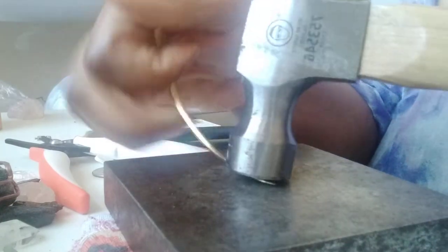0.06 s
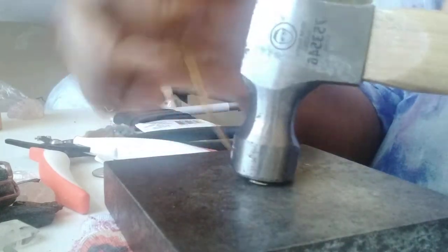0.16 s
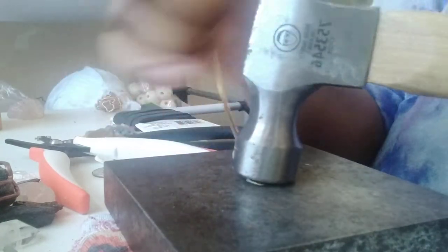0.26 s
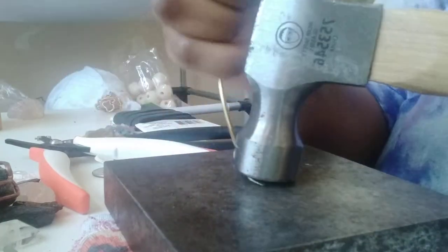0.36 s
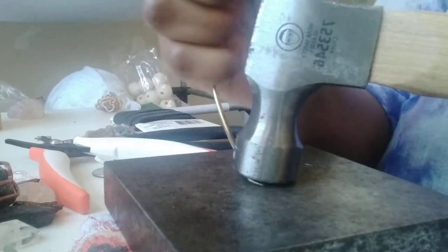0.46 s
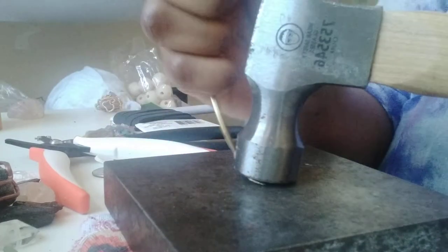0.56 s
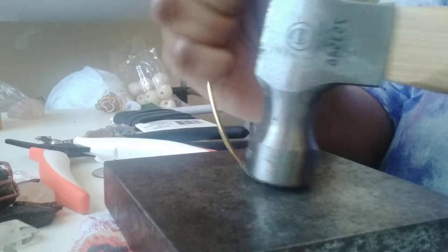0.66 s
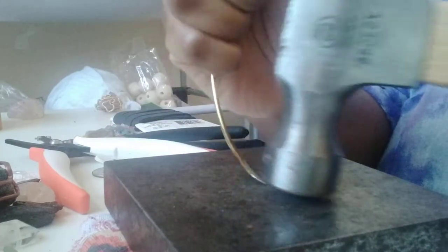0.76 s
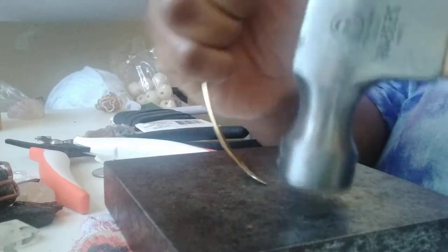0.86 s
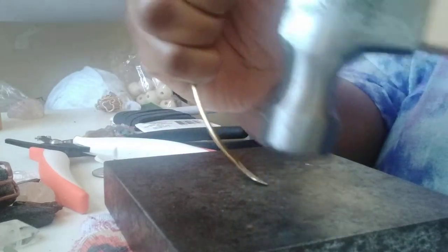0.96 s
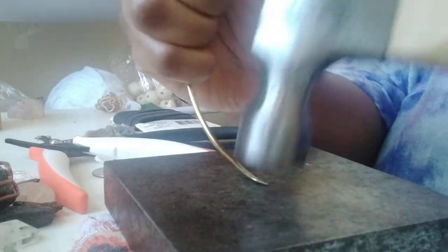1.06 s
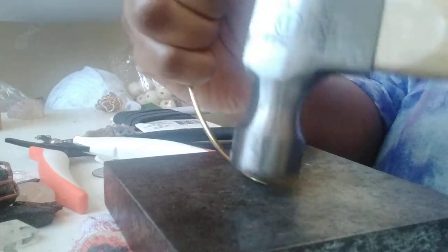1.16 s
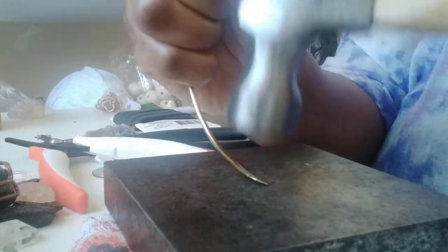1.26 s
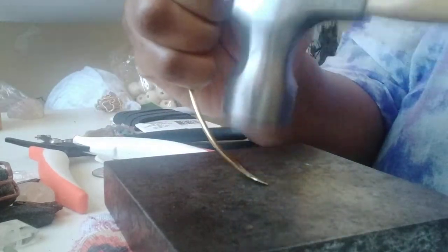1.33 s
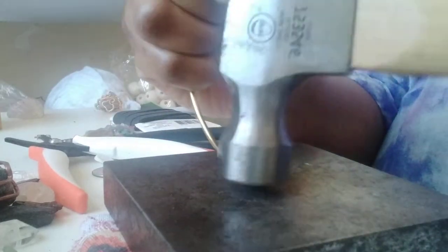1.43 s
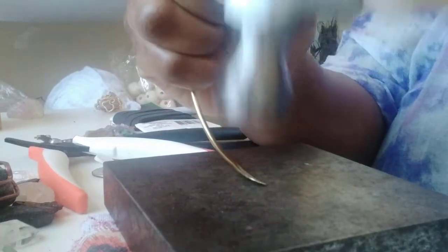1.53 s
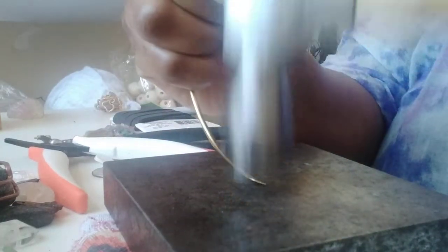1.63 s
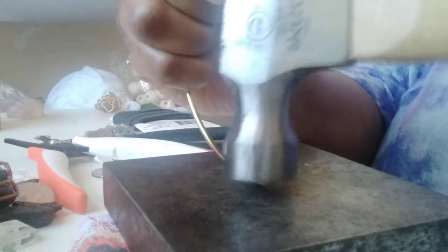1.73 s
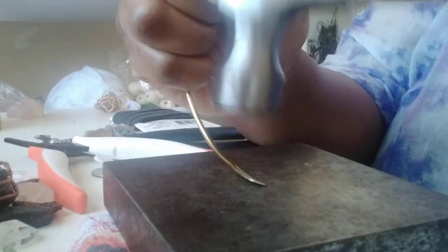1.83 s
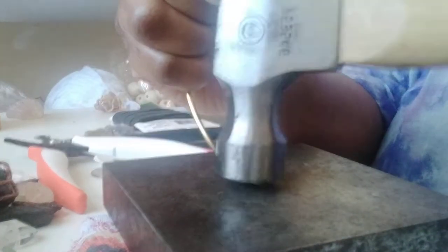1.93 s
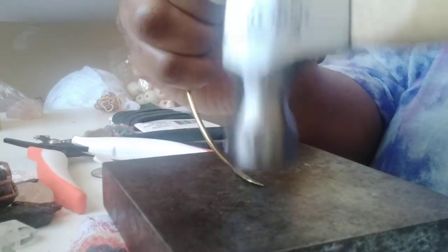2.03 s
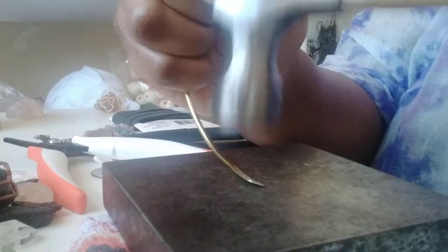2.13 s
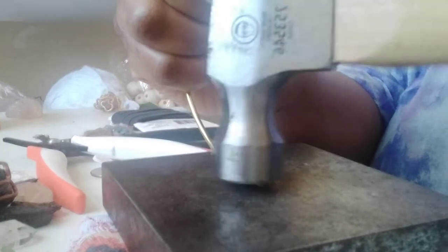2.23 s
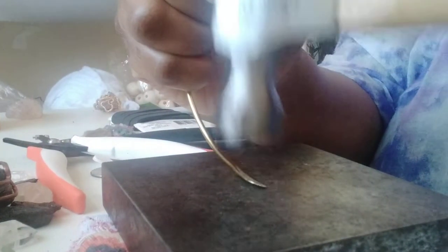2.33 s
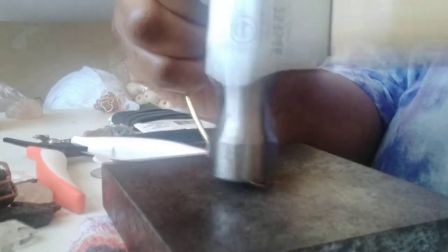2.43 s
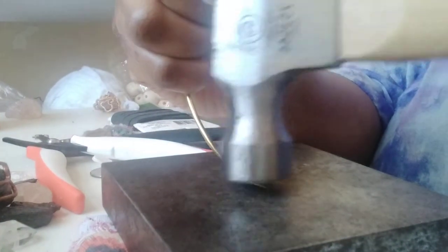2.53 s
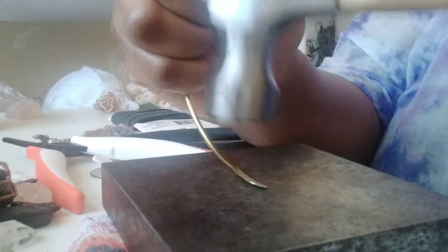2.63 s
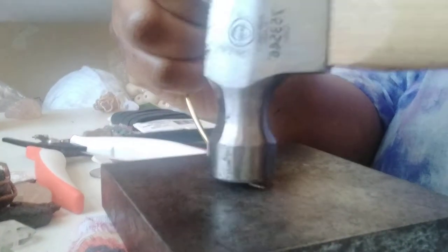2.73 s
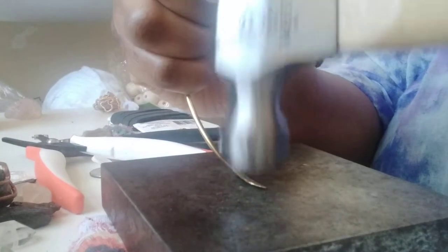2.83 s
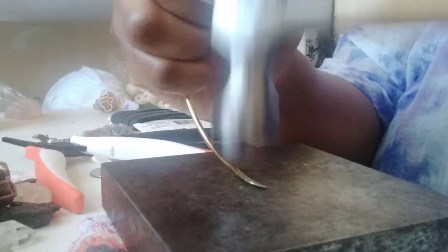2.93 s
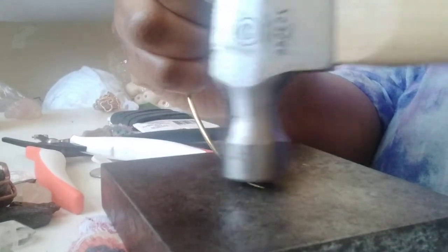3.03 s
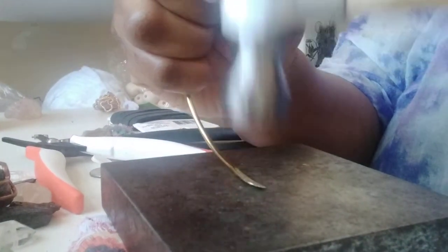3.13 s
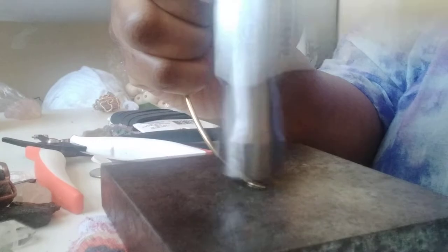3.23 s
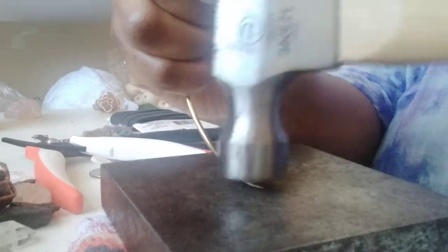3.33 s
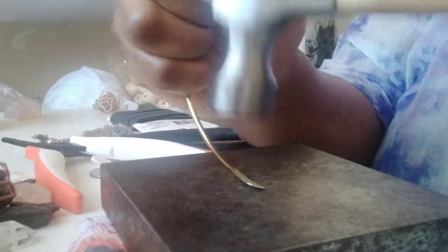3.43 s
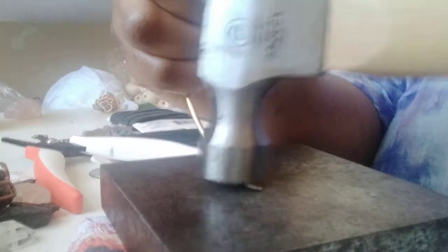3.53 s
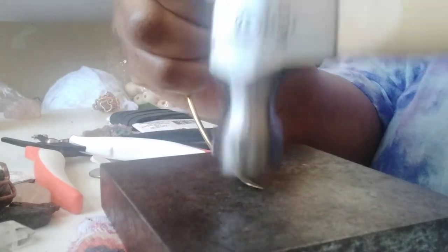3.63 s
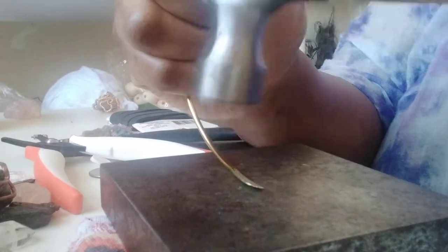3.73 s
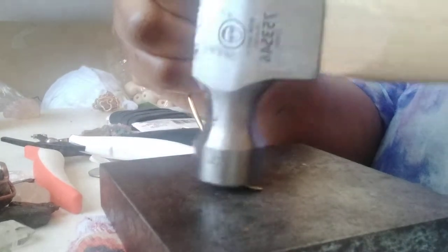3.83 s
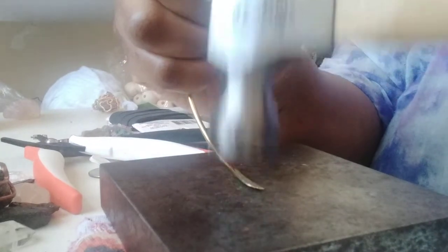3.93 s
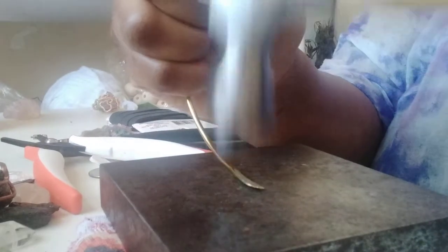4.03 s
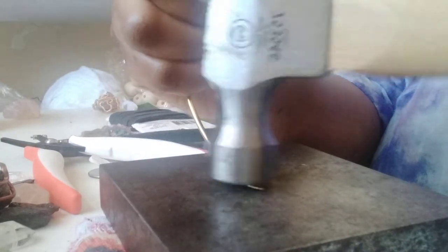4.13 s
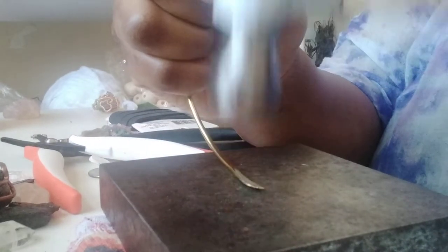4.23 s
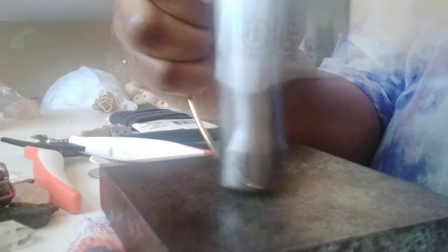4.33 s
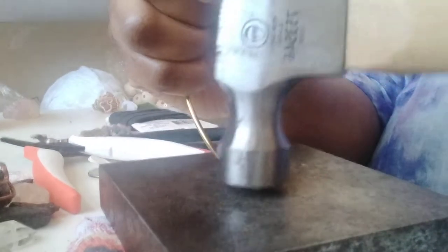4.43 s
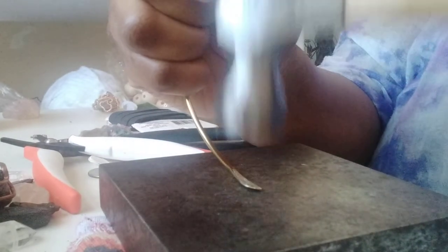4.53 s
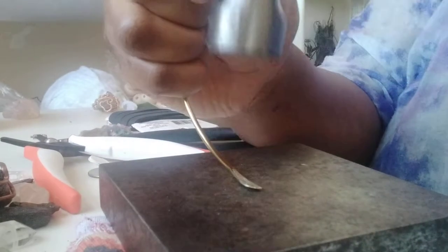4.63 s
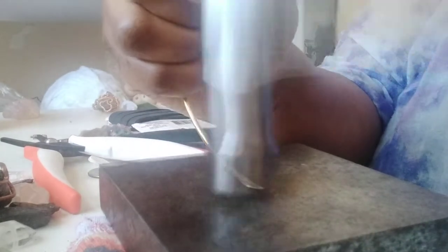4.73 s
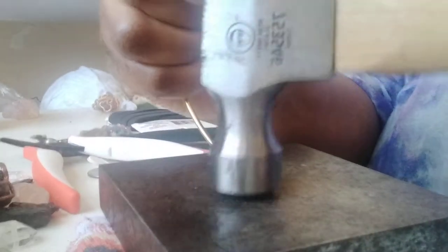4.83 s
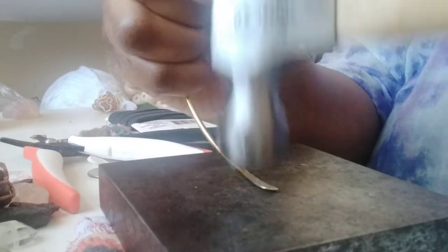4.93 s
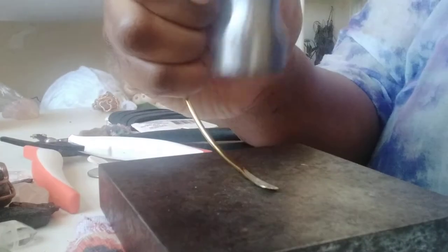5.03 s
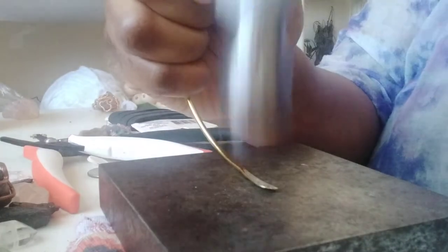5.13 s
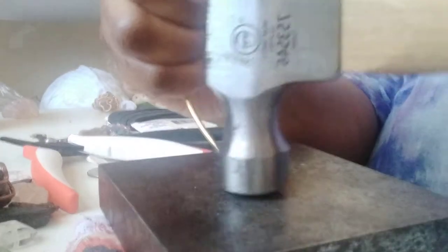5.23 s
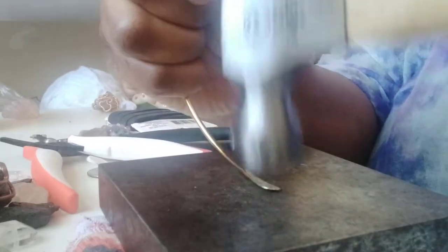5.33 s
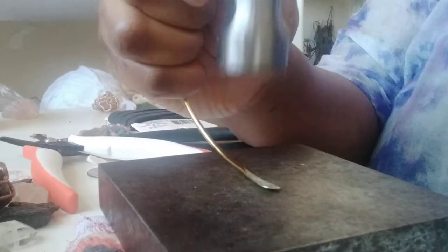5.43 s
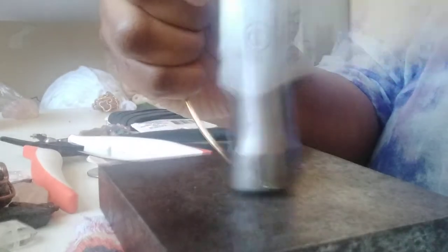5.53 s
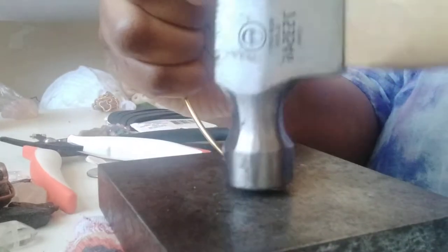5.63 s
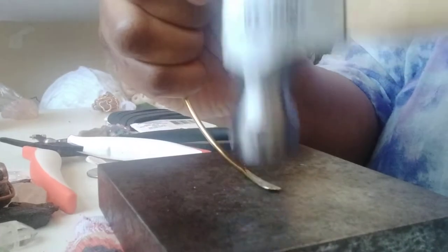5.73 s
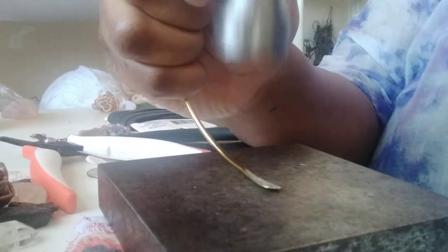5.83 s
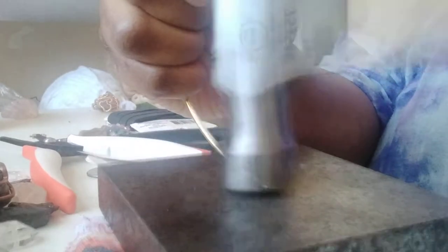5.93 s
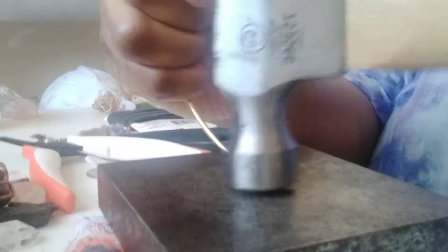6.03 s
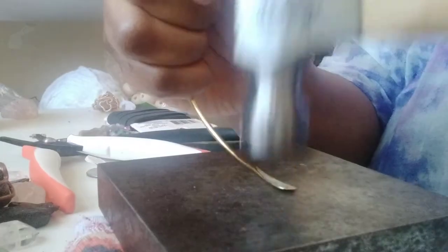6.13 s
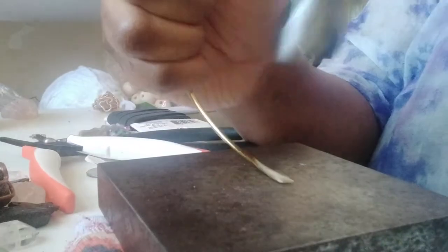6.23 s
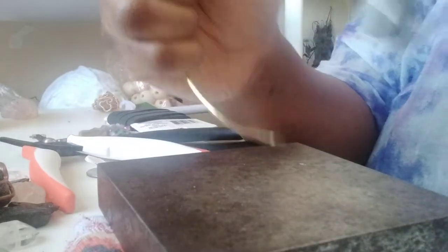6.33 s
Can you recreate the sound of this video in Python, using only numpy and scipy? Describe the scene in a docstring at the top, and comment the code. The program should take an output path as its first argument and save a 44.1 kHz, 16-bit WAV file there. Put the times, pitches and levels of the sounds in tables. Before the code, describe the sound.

In a small workroom over low rumble, faint taps and scuffs lead into twelve quick hammer blows on soft wire laid on a steel block. Each thumps the bench and makes loose clutter jump and rattle, growing heavier. Then five slower, much louder blows hit bare steel, ringing bright and high and overloading the close phone microphone. A few small taps and scuffs end it.

```python
"""Small taps and scuffs open the scene and return between the blows, over a low rumble and faint hiss.
Twelve blows on soft wire then grow heavier: each thumps the bench and shakes loose clutter, which rattles as it lands.
After 4.2 s five hard blows meet bare steel: head and block ring clear and overload the phone's input.
A few last taps follow. Filtered noise, decaying sines and random clicks make these sounds, with a short room tail.
"""
import sys
import numpy as np
from scipy import signal
from scipy.fft import rfft, irfft, next_fast_len
from scipy.io import wavfile
from scipy.ndimage import uniform_filter1d

SR = 44100
rng = np.random.default_rng(int(sys.argv[2]) if len(sys.argv) > 2 else 0)


def output_pcm(signal):
    """Save a mono or channel-first signal as 16-bit PCM at the path in sys.argv[1].

    Samples are clipped to [-1, 1] before scaling.
    """
    pcm = np.clip(np.atleast_2d(signal).T, -1, 1) * 32767
    wavfile.write(sys.argv[1], SR, np.round(pcm).astype(np.int16))


N = 280917  # length in samples


def undb(db):
    """Level law: decibels become an amplitude ratio."""
    return 10 ** (np.asarray(db) / 20)


def unit(x):
    """Normalisation: scale a signal to an rms of 1."""
    return x / np.sqrt(np.mean(x ** 2))


def colour(x, points, share=1):
    """Spectral shaping: a gain through (Hz, dB) points joined on a log-frequency axis."""
    size = next_fast_len(x.shape[-1])
    hz, db = np.transpose(points)
    log_hz = np.log(np.fft.rfftfreq(size, 1 / SR) + 1)
    gain = undb(share * np.interp(log_hz, np.log(np.maximum(hz, 1)), db))
    return irfft(rfft(x, size) * gain, size)[..., :x.shape[-1]]


def band(x, hz, width):
    """Resonance: a single peak filter of the given width in Hz."""
    return signal.lfilter(*signal.iirpeak(hz, hz / width, SR), x)


def add(out, s, x):
    """Superposition: mix x into out from time s on."""
    i = int(s * SR)
    n = min(x.shape[-1], N - i)
    out[..., i:i + n] += x[..., :n]


def ring(modes, t, scatter_db, damping=1):
    """Modal decay: damped sines whose levels, save the first, scatter anew at each blow."""
    chance = rng.standard_normal(len(modes))
    total = 0
    for k, ((hz, db, t60), c) in enumerate(zip(modes, chance)):
        level = undb(db + scatter_db * c * (k > 0))
        total = total + level * np.sin(2 * np.pi * hz * t) * undb(-60 * t * damping / t60)
    return total


def burst(t, start, rise, hold, fall):
    """Transient envelope, in seconds: a smooth rise, a plateau, an exponential fall."""
    up = np.clip((t - start) / rise, 0, 1)
    return up ** 2 * (3 - 2 * up) * np.exp(-np.maximum(t - start - rise - hold, 0) / fall)


def grains(rate, spread_db):
    """Impact statistics: random clicks of uneven size, rate per second, unrelated at the two microphones."""
    size = undb(spread_db * rng.exponential(size=(2, N))) * rng.standard_normal((2, N))
    return size * (rng.random((2, N)) < rate / SR)


def flicker(rate, spread_db):
    """Random modulation: a level in dB that changes about rate times a second."""
    k = int(SR / rate)
    smooth = uniform_filter1d(uniform_filter1d(rng.standard_normal(N), k), k)
    return spread_db * unit(smooth)


def played(envelope, clicks, points):
    """Excitation and colour: clicks under an envelope, then shaped, scaled by the rms of the shaped clicks."""
    return colour(envelope * clicks, points) / np.std(colour(clicks, points))


def shimmer(bands, t):
    """High modal density: crowded modes as decaying narrow noise, unrelated at the two microphones."""
    total = 0
    for hz, width, db, t60 in bands:
        noise = rng.standard_normal((2, len(t)))
        narrow = band(band(noise, hz, width), hz, width)
        total = total + undb(db - 60 * t / t60) * unit(narrow)
    return total


RUMBLE_DB, HISS_DB = -46, -75
# Spectrum of the rumble. Each row: frequency in Hz, relative density in dB per Hz.
RUMBLE_SPECTRUM = [(12, -28.5), (20, 4), (40, 1), (75, -10), (105, -5.5), (131, -14), (157, -18),
                   (192, -8.5), (312, -22), (406, -24), (497, -32.5), (646, -34), (948, -44), (2500, -48.5),
                   (3250, -46.5), (5500, -65)]


def rumble():
    """Coherent noise field: the wavering low rumble of the house, nearly alike at both microphones, over hiss."""
    mid, side = (unit(colour(rng.standard_normal(N), RUMBLE_SPECTRUM)) for _ in range(2))
    low = undb(RUMBLE_DB + flicker(4.9, 3.2)) * (mid + .35 * side * np.array([[1], [-1]]))
    return low + undb(HISS_DB) * rng.standard_normal((2, N))


ROOM_DB = -13.5  # energy of the tail relative to the direct sound
# Reverberation of the small room. Each row: band centre in Hz, time to fall by 60 dB in seconds.
ROOM_DECAY = [(300, 0.2), (1000, 0.39), (3000, 0.38), (7000, 0.32), (12000, 0.12)]


def room(x):
    """Diffuse reverberation: convolve with a separate noise tail per microphone, shortest in the top band."""
    t = np.arange(SR // 2) / SR
    tail = 0
    for hz, t60 in ROOM_DECAY:
        noise = band(rng.standard_normal((2, len(t))), hz, 1.68 * hz)
        tail = tail + noise / np.sqrt(hz * t60) * undb(-60 * t / t60)
    tail = tail * burst(t, .002, .004, 1, 1)
    tail = tail / np.sqrt(np.sum(tail ** 2, axis=1, keepdims=True))
    return undb(ROOM_DB) * signal.fftconvolve(x, tail, axes=1)[:, :N]


BARE_FROM_S = 4.2  # from here the wire is flat and the head meets bare steel
CHATTER_DB = (-8.5, 5.5)  # above the jump: (on soft wire, on bare steel)
KNOCK_DB, KNOCK_SLOPE = -2, 0.82  # landing knock at a 0 dB landing; dB per dB
KNOCK_S, FIRST_KNOCK_DB = 0.0417, -3.5  # heavy things land after this; knock of the blow relative to the landing's
KNOCK_TOP_HZ = 1850
# Hammer blows. Each row: start in seconds, force in dB, bench bounce in Hz, bounce level in dB,
# contact crack in dB, clutter jump in dB, delay until the clutter lands in ms, landing level in dB.
HAMMER_BLOWS = [(1.072, -41, 32, -23.5, -70, -63, 20, -62.5),
                (1.3455, -29.5, 33.6, -11, -48.5, -28.5, 36, -32),
                (1.6166, -25, 34.3, -10.5, -43.5, -35, 34, -27),
                (1.871, -23.5, 34.4, -9, -43.5, -27, 32.4, -24),
                (2.1398, -26, 34.4, -7.5, -43, -27.5, 28, -22.5),
                (2.3952, -21, 39, -6, -41, -26, 32.4, -26),
                (2.664, -17, 36.1, -4.5, -28.5, -15.5, 28.7, -21),
                (2.9237, -17, 46, -6.5, -29, -32.5, 13.6, -31.5),
                (3.2036, -16, 36.4, -5, -31.5, -17, 28, -19.5),
                (3.478, -14, 41.2, -5.5, -36, -26, 23.3, -25.5),
                (3.7499, -9, 44.1, -3.5, -31, -15, 25.8, -17),
                (4.0243, -10, 43.6, -4, -19, -6.5, 23.6, -21.5),
                (4.3003, -1, 40.9, -13.5, -12, -11, 31.7, -12.5),
                (4.7068, -2.6, 40.0, -22.5, -13, -15, 24.8, -15),
                (5.1267, -1.2, 40.5, -8, -12, -21, 21.8, -13),
                (5.4976, -2, 40.0, -23, -4.5, -9.5, 21.2, -14.5),
                (5.8965, 1.2, 39.8, -31.5, -11, -13.5, 28, -11)]
# Small taps of wire, hand and clutter. Each row: start in seconds, knock in dB, scuff in dB, wire ring in dB.
SMALL_TAPS = [(0.148, -57, -59, -78), (0.597, -59, -54.5, -79), (0.642, -66, -59.5, -74),
              (0.979, -48.5, -75, -62), (1.111, -69, -60, -59), (2.352, -47, -72, -68),
              (2.537, -37, -43, -63), (3.89, -34, -56, -69), (4.592, -46.5, -37, -49.5),
              (4.613, -44, -63, -51), (5.406, -43.5, -53, -66), (5.431, -42.5, -52, -59),
              (5.459, -43.5, -54, -62), (6.156, -49, -50.5, -62), (6.197, -42, -43.5, -70),
              (6.221, -44, -43.5, -70), (6.232, -54, -41.5, -76), (6.279, -67.5, -54.5, -77.5),
              (6.31, -61, -57, -81)]
# Clutter under blows on soft wire. Each row: frequency in Hz, relative density in dB per Hz.
SOFT_BLOW_RATTLE = [(300, -11), (600, -1), (900, -14.5), (1800, -7.5), (3200, -9), (5000, -16.5),
                    (6400, -21.5), (7500, -20), (8800, -25), (10400, -26), (11600, -36), (15700, -50.5)]
# Clutter under blows on bare steel. Each row: frequency in Hz, relative density in dB per Hz.
HARD_BLOW_RATTLE = [(290, -16.5), (500, -10.5), (943, -18.5), (1700, -13), (2900, -13), (4740, -15.5),
                    (6060, -22), (7100, -19.5), (9330, -31.5), (10500, -23.5), (11800, -57), (15700, -50)]
# Scuffing of the small taps. Each row: frequency in Hz, relative density in dB per Hz.
SCUFF_SPECTRUM = [(600, -17), (1500, 3.3), (3500, 2), (5000, -14), (7500, -11), (10000, -16), (14000, -59)]
# Resonances of the dull knocks. Each row: frequency in Hz, width in Hz, relative level in dB.
KNOCK_RESONANCES = [(199, 17, 6), (298.6, 35, 14), (378, 180, 5), (479, 150, 9), (542, 20, -4),
                    (639, 30, 6), (796, 30, -9.5), (1300, 100, -29.5)]


def clutter():
    """Impact noise: contact crack, jolt as loose things jump, chatter in flight, then rattle and knocks on landing."""
    light, hard, dull, scuff = np.zeros((4, N))
    t = np.arange(SR // 4) / SR
    for s, *_, crack_db, jolt_db, land_ms, rattle_db in HAMMER_BLOWS:
        bare = s > BARE_FROM_S
        chatter_db = jolt_db + CHATTER_DB[bare]
        crack = undb(crack_db) * burst(t, 0, 0.001, 0.0042, 0.0033)
        jolt = undb(jolt_db) * burst(t, .008, .001, .003, .003)
        chatter = undb(chatter_db) * burst(t, .012, 0.0062, 0.0013, 0.0093)
        landing = undb(rattle_db) * burst(t, land_ms / 1000, 0.0038, 0.013, 0.023)
        add(hard if bare else light, s, crack + jolt + chatter + landing)
        knock_db = KNOCK_DB + KNOCK_SLOPE * rattle_db
        first_knock = undb(FIRST_KNOCK_DB) * burst(t, 0.0054, 0.0035, 0.003, 0.024)
        landing_knock = burst(t, KNOCK_S, .004, 0.0061, 0.011)
        add(dull, s, undb(knock_db) * (first_knock + landing_knock))
    for s, tap_db, scuff_db, _ in SMALL_TAPS:
        add(dull, s, undb(tap_db) * burst(t, 0, .002, .006, .005))
        add(scuff, s, undb(scuff_db) * burst(t, 0, 0.00042, 0.0015, 0.0065))
    # things land in clumps, heard at both microphones at once
    clicks = grains(9000., 1.5) * undb(flicker(180., 3.6))
    bumps = grains(1200., 1.5)
    # dull knocks are mostly common to both microphones
    bumps = bumps[0] + 0.2 * np.array([bumps[1], -bumps[1]])
    resonant = sum(undb(db) * band(bumps, hz, width) for hz, width, db in KNOCK_RESONANCES)
    knock = dull * unit(resonant)
    knock = signal.sosfilt(signal.butter(4, KNOCK_TOP_HZ, fs=SR, output="sos"), knock)
    rattle = played(light, clicks, SOFT_BLOW_RATTLE) + played(hard, clicks, HARD_BLOW_RATTLE)
    return rattle + played(scuff, clicks, SCUFF_SPECTRUM) + knock


SWING_DB = (-18, -2.5)  # push on the input above the force: (on soft wire, on bare steel)
BENCH_KNOCK_DB = (-5, -8)  # ring of the bench top above the knock: (at the jump, at the landing)
JUMP_S, LEFT_LAG_S = .006, .0003
# Bench giving under the blow. Each row: multiple of the bounce rate, signed size,
# time to fall by 60 dB in seconds for a bounce at 40 Hz.
BOUNCE_PARTIALS = [(1, .58, .18), (1.95, -.95, .085), (3.4, -.4, .035), (5.1, -.18, .09), (7.4, .12, .12)]
# Modes of the bench top. Each row: frequency in Hz, relative level in dB, undamped time to fall by 60 dB in seconds.
BENCH_MODES = [(130.5, 0, .27), (63, -12, .25), (204, -2, .15), (292, -7, .22), (388, -15, .15),
               (474, -12, .2), (540, -15, .14), (652, -18, .14), (860, -23, .14)]
# Ring of a small tap. Each row: frequency in Hz, relative level in dB, time to fall by 60 dB in seconds.
TAP_MODES = [(460, 4, 0.93), (494, -12, .4), (980, -11.5, 0.06)]


def bench():
    """Structure-borne sound: bounce and ring reach the phone through its stand; blows push the input off centre."""
    thump, hum, shove = np.zeros((3, N))
    t = np.arange(SR // 2) / SR
    for s, force_db, hz, bounce_db, *_, rattle_db in HAMMER_BLOWS:
        # heavy things strike the upper modes of the top as they jump and as they land
        knock_db = KNOCK_DB + KNOCK_SLOPE * rattle_db
        for late_s, db in zip((JUMP_S, KNOCK_S), BENCH_KNOCK_DB):
            add(hum, s + late_s, undb(knock_db + db) * ring(BENCH_MODES[2:], t, 2.5, damping=4.5))
        # a slower bounce also dies more slowly
        bounce = 0
        for multiple, size, t60 in BOUNCE_PARTIALS:
            bounce = bounce + size * np.sin(2 * np.pi * multiple * hz * t) * undb(-60 * t * hz / 40 / t60)
        add(thump, s, undb(bounce_db) * bounce)
        # the top rings once the wave has crossed the bench
        add(hum, s + .006, -undb(force_db) * ring(BENCH_MODES, t, 1.5) * burst(t, 0, .006, 1, 1))
        swing_db = force_db + SWING_DB[s > BARE_FROM_S]
        add(shove, s, -undb(swing_db) * burst(t, .003, .015, .012, .014))
    for s, *_, ring_db in SMALL_TAPS:
        add(hum, s, undb(ring_db) * ring(TAP_MODES, t, 2.0) * burst(t, 0, .002, 1, 1))
    # the input coupling lets the push through, then swings slowly back past centre
    thump += signal.lfilter(*signal.butter(2, 3.2, "high", fs=SR), shove)
    # the bounce shakes the right microphone harder; the left one sits a little further from the blow
    both = thump * undb(np.array([[-.6], [.6]])) + hum * undb(np.array([[.8], [-.8]]))
    return np.array([np.roll(both[0], int(LEFT_LAG_S * SR)), both[1]])


# ring in dB at a 0 dB force, then dB of ring per dB of force: (on soft wire, on bare steel)
HEAD_DB, BLOCK_DB = (-32, -25), (-28.5, -25.5)
RING_SLOPE = (.7, 1.)  # soft wire passes on only part of the force
# Modes of the hammer head. Each row: frequency in Hz, relative level in dB,
# time to fall by 60 dB in seconds when the head rebounds freely.
HEAD_MODES = [(10310, 0, .25), (10270, -6, .2), (9771, -13, .15), (10650, -4, .04), (13470, -19, .24),
              (13520, -20, .3)]
# Modes of the steel block. Each row: frequency in Hz, relative level in dB, time to fall by 60 dB in seconds.
BLOCK_MODES = [(6930, 0, .45), (6933, -9, .85), (6470, -7, .32), (6495, -11, .25), (6522, -6, .36),
               (4200, -10, .28), (4232, -9, .36), (4270, -12, .3), (4590, -9, .25), (3623, -14, .2),
               (5696, -16, .2), (7607, -16, .2)]
# Crowded modes after blows on soft wire. Each row: frequency in Hz, width of each of two filter passes in Hz,
# relative level in dB, time to fall by 60 dB in seconds.
SOFT_BLOW_SHIMMER = [(7450, 1000, -6, 0.4), (10300, 450, -9, 0.2)]
# Crowded modes after blows on bare steel. Each row: frequency in Hz, width of each of two filter passes in Hz,
# relative level in dB, time to fall by 60 dB in seconds.
HARD_BLOW_SHIMMER = [(4230, 160, -4, .4), (6500, 120, -14, .22), (6930, 50, -9, .45),
                     (10300, 300, -15, .18), (13490, 80, -16, .28)]


def steel():
    """Contact damping: rebounding blows ring clear; blows resting on wire leave a short tick and rough shimmer."""
    clear, rough = np.zeros(N), np.zeros((2, N))
    t = np.arange(SR // 2) / SR
    next_starts = [row[0] for row in HAMMER_BLOWS[1:]] + [N / SR]
    for (s, force_db, *_), next_s in zip(HAMMER_BLOWS, next_starts):
        hard = s > BARE_FROM_S
        head_db = RING_SLOPE[hard] * force_db + HEAD_DB[hard]
        block_db = RING_SLOPE[hard] * force_db + BLOCK_DB[hard]
        damping_db = 0 if hard else 1500 * t  # the wire damps the head at 1500 dB per second
        add(clear, s, undb(head_db - damping_db) * ring(HEAD_MODES, t, 1.6) * burst(t, 0, 0.00037, 1, 1))
        # the block's ring fades out shortly before the next blow
        fade = burst(t, 0, .018, next_s - s - .05, .01)
        add(clear, s, hard * undb(block_db) * ring(BLOCK_MODES, t, 3.6) * fade)
        bands = HARD_BLOW_SHIMMER if hard else SOFT_BLOW_SHIMMER
        add(rough, s, undb(block_db) * shimmer(bands, t) * burst(t, 0, 0.0025, 1, 1))
    # the shaking bench makes the ring flutter, drawn here as random level changes
    return clear * undb(flicker(40., 1.3)) + rough * undb(flicker(45., 3.))


# Opposite colouring of the two microphones. Each row: frequency in Hz, left minus right in dB.
MICROPHONE_BALANCE = [(60, -3.5), (400, -4.5), (900, 2), (2500, 0.5), (5000, 3.5), (7500, 13),
                      (10300, -12.5), (13000, -6)]


def scene():
    """Superposition: airborne sound, its room tail, bench-borne sound and the background add up."""
    air = clutter() + steel()
    near = air + room(air) + bench()
    # the two microphones face different ways and colour the sound oppositely
    left = colour(near[0], MICROPHONE_BALANCE, share=.5)
    right = colour(near[1], MICROPHONE_BALANCE, share=-.5)
    return np.array([left, right]) + rumble()


GATE_DB, GATE_HZ = -60.5, 900  # treble level at which the gate is half shut; where the treble begins
TOP_HZ = 15830


def record(dry):
    """Nonlinear input: a gate shuts faint treble, the converter clips peaks beyond full scale, the top is cut."""
    high_pass = signal.butter(3, GATE_HZ, "high", fs=SR, output="sos")
    treble = signal.sosfiltfilt(high_pass, dry)
    power = uniform_filter1d(np.mean(treble ** 2, axis=0), size=900)
    shut = 1 / (1 + (power / undb(GATE_DB) ** 2) ** 3)
    gated = dry - .9 * shut * treble
    clipped = np.clip(gated, -1, 1)
    cut = signal.sosfilt(signal.ellip(8, .2, 40, TOP_HZ, fs=SR, output="sos"), clipped)
    return np.clip(cut, -1, 1)


dry = scene()
out = record(dry)
output_pcm(out)
```